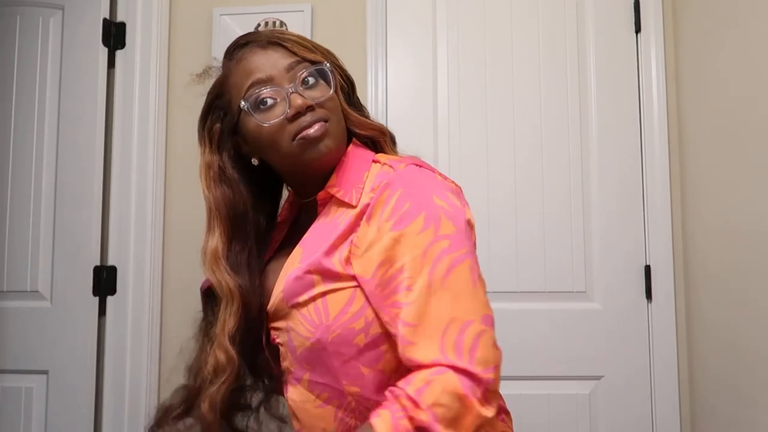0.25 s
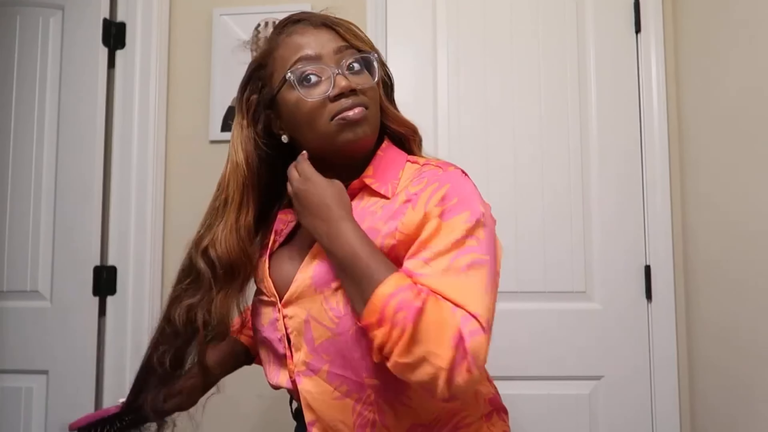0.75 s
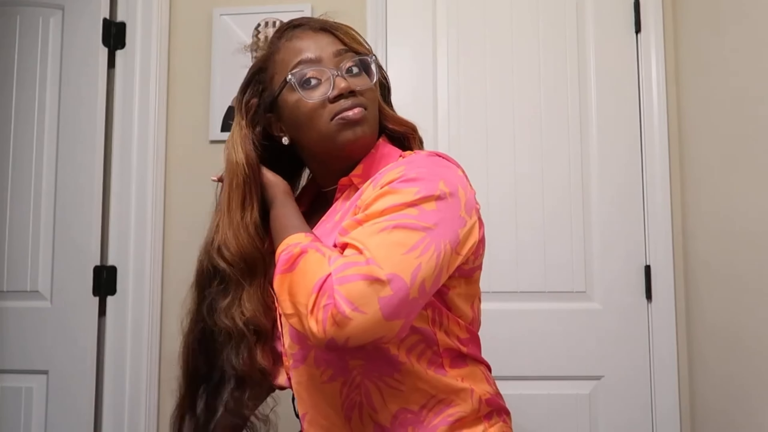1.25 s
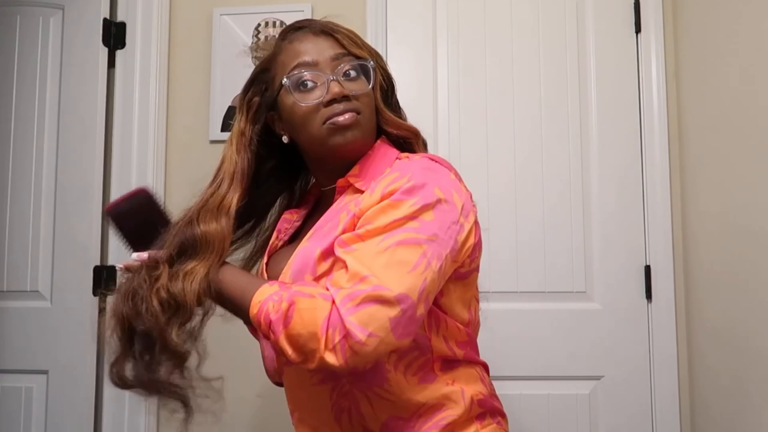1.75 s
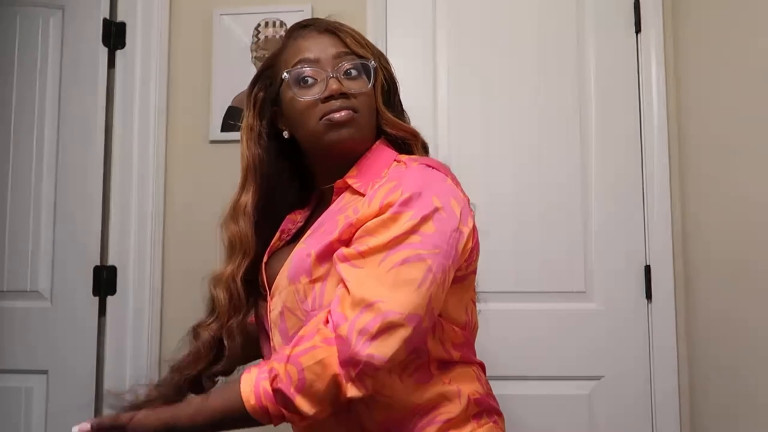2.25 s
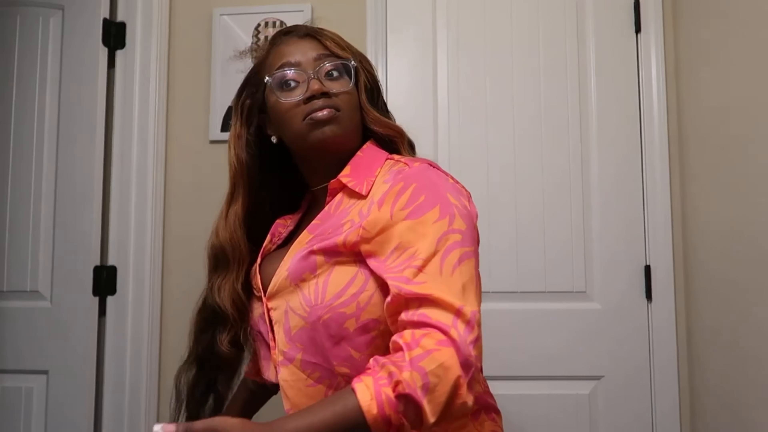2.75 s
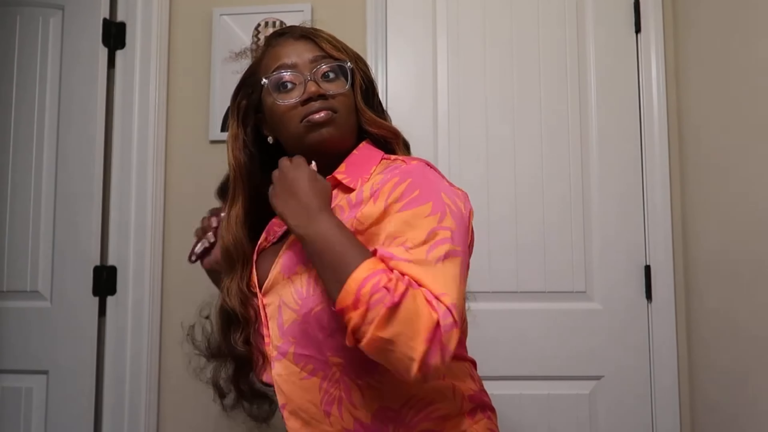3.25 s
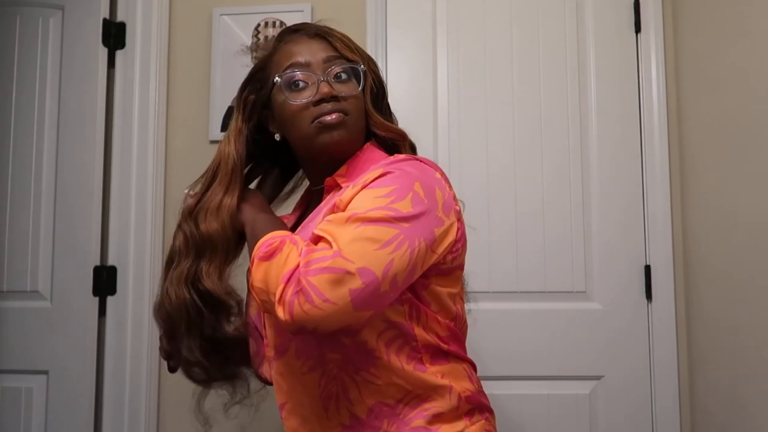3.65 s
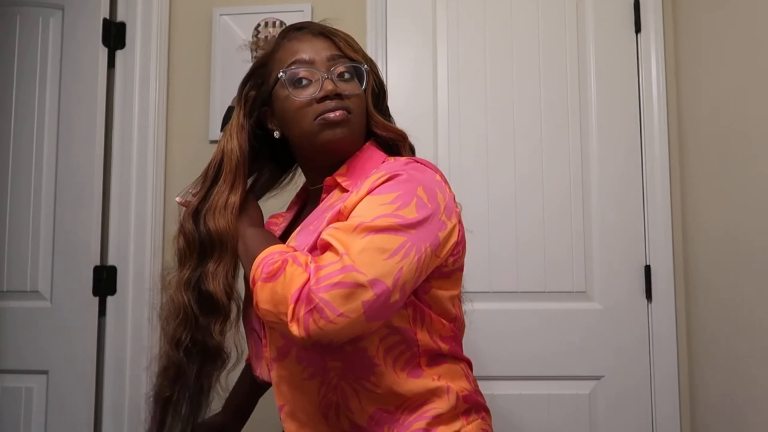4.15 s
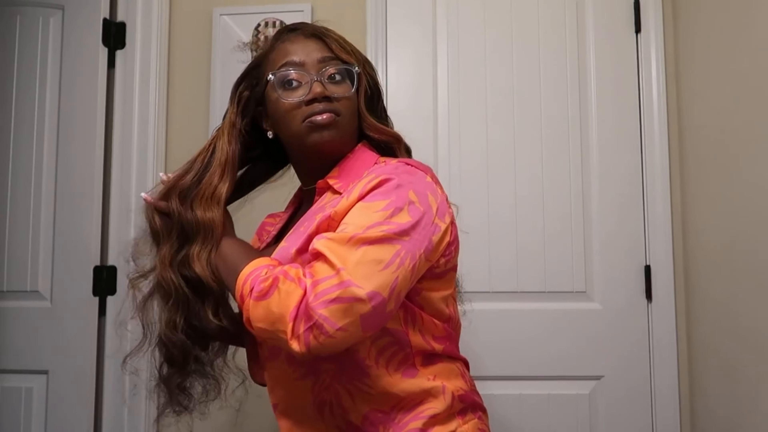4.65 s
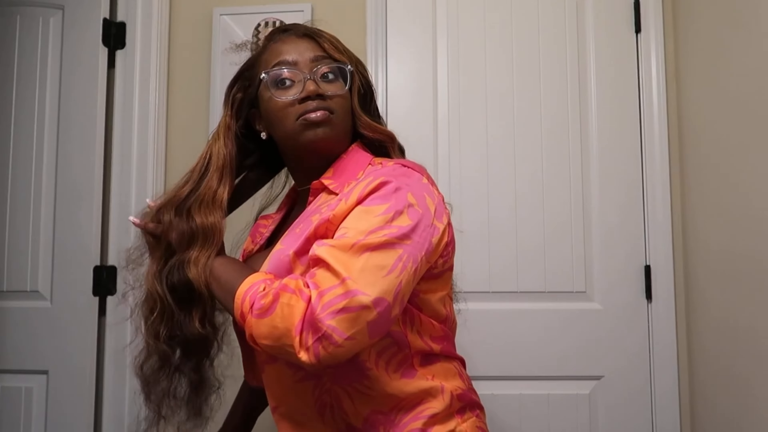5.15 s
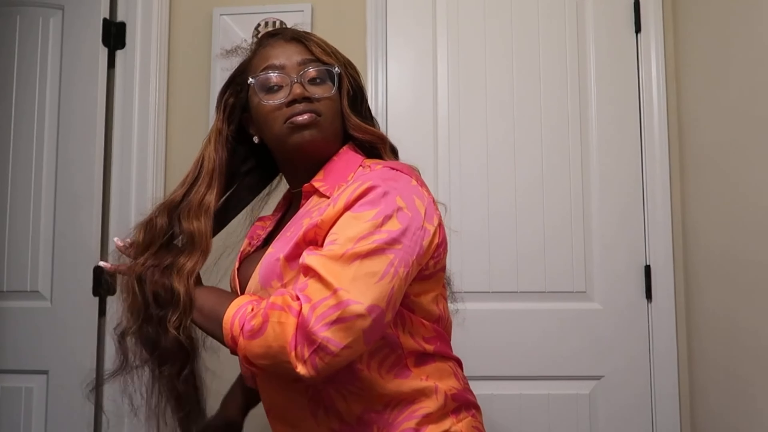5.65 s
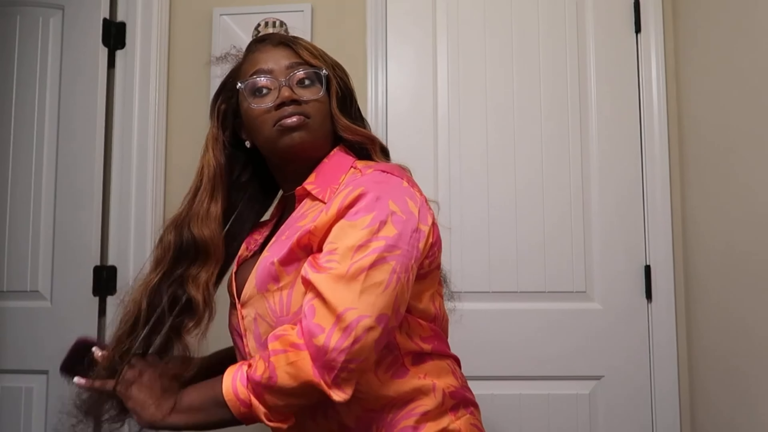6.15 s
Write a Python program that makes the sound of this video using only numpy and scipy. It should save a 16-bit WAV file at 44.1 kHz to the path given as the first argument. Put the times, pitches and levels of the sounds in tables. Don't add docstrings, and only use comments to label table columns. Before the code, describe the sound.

A paddle brush rasps through long wavy hair in swishing strokes, with sharp hollow knocks as knots let go, in a quiet room.

```python
import sys
import numpy as np
from scipy import signal
from scipy.io import wavfile
from scipy.ndimage import uniform_filter1d

SR = 44100
rng = np.random.default_rng(int(sys.argv[2]) if len(sys.argv) > 2 else 0)


def store_pcm(level_fs):
    pcm = np.round(np.clip(level_fs, -1, 1) * 32767).astype(np.int16)
    wavfile.write(sys.argv[1], SR, np.atleast_2d(pcm).T)


def volts(x):
    e = np.asarray(x, float) / 20
    return 10 ** e


N = 282240
MS_COUNT = N * 1000 // SR + 2

# frequency in Hz, density in dB per Hz.
AIR_MID = [(12, -35), (20, -8.5), (109, 1), (140, 1), (175, -8.5), (238, -8), (478, -13.5), (565, -19.5),
           (834, -16.5), (1130, -21.5), (1300, -23), (2610, -24.5), (9130, -38), (12100, -44), (15500, -47)]
# frequency in Hz, density in dB per Hz.
AIR_SIDE = [(20, -32), (74, -16), (130, -11.5), (240, -5), (450, -7.5), (900, -15.5), (1600, -19),
            (3000, -26), (6100, -28.5), (7400, -36), (11800, -31), (14400, -40), (15500, -55), (16000, -70)]
# start in seconds, end in seconds, pull in dB,
# change to the end in dB, rasp over the pull in dB.
GLIDES = [(0.066, 0.112, -46.5, 7.5, -16), (0.114, 0.385, -42, -1, -11), (0.419, 0.688, -44, 3.5, -11.5),
          (0.928, 1.128, -55, 7, -5.5), (1.963, 2.198, -51, 10.5, -13), (2.165, 2.569, -43.5, -1.5, -12),
          (3.394, 3.60, -45.5, 4, -12.5), (3.605, 4.018, -43.5, -1.5, -9), (4.712, 4.875, -42, 1, -10.5),
          (5.86, 6.285, -64, 7.5, -6.5), (6.325, 6.418, -61.5, 26, -16)]
# peak in seconds, pull in dB, thump over the pull in dB,
# upper modes over the pull in dB, fall in dB per second.
TUGS = [(0.15, -41, -22, -13, 61), (0.586, -41, -5, -15, 122), (0.739, -37, -4.5, -4, 120),
        (1.178, -35, 2, 2.5, 150), (1.311, -30.5, 9.5, 5.5, 232), (1.36, -42.5, 5, 2.5, 134),
        (2.60, -43, 7.5, 4, 150), (2.648, -38.5, 4.5, 4.5, 150), (2.709, -24.5, 3, -18, 430),
        (2.791, -31.5, 0, 3, 199), (2.886, -47.5, -2.5, -4, 79), (3.89, -37, -9, -18, 148),
        (4.046, -31.5, -4, 0.5, 262), (4.156, -26, -2, -5, 300), (4.189, -23, -13.5, -1, 270),
        (4.224, -35, -18, 5, 175), (4.906, -28.5, -5, -8.5, 134), (4.96, -37, 0.5, -1, 200),
        (5.008, -37, -2.5, 0, 133), (5.075, -44.5, -4, 3, 150), (5.158, -23, -9.5, -2.5, 216),
        (5.268, -44, -12.5, -5.5, 117), (5.60, -42, -16, -9.5, 200), (5.646, -35.5, -9.5, -17, 163)]
# start in seconds, rasp in dB, hiss over the rasp in dB,
# rise in dB per second, hold in seconds.
SCRAPES = [(0.194, -45, -17, 353, .01), (0.55, -60.5, 0, 82, 0.12), (0.717, -46, -6.5, 400, 0.13),
           (1.102, -61, -18, 298, .02), (1.174, -38.5, -14.5, 700, 0.047), (1.278, -44, -19, 2500, .01),
           (1.293, -30.5, -15.5, 1200, .025), (1.664, -59.5, -5, 33, .15), (2.2, -54.5, -3, 44, .08),
           (2.595, -44, -16, 2000, .02), (2.64, -43, -8.5, 900, 0.033), (2.706, -41, -8, 600, 0.035),
           (2.801, -33, -15.5, 332, 0.039), (3.998, -45, -14, 400, .02), (4.029, -38.5, -11.5, 900, 0.024),
           (4.156, -34.5, -16.5, 1500, 0.026), (4.224, -36.5, -15, 137, 0.0069),
           (4.88, -40.5, -16.5, 500, 0.081), (4.961, -43.5, -9.5, 200, 0.062),
           (5.07, -43, -10.5, 900, 0.018), (5.142, -33, -5.5, 2500, 0.034), (5.64, -56.5, -1, 300, 0.033),
           (5.698, -51.5, -7, 110, .01), (6.218, -64, -13, 400, .06)]
# start in seconds, peak in dB, then thump, upper modes and rasp,
# each over the peak in dB.
SNAGS = [(0.713, -29, -26, -5, -5), (1.154, -35, -15, -3, -3), (1.169, -26.5, -1.5, -8, -13),
         (1.281, -34, -14, -15, 7), (1.295, -17.5, 7, -3.5, -11), (2.556, -32.5, -3, -4, -17),
         (2.594, -27.5, -22, -3, -22), (2.634, -26.5, -22, 2, -24), (2.704, -19, -4, -22, -15),
         (2.72, -33, -22, 7, -6), (2.77, -20, -19, -9, -23), (2.79, -33.5, -11, -13, 6),
         (3.995, -29, -25, -9, -17), (4.023, -26.5, -11, -17, -20), (4.146, -31, 3, -6, -15),
         (4.715, -47, 1, 11.5, -2), (4.791, -30, -32, -19, -18), (4.878, -28, -25, -6, -7.5),
         (4.902, -20.5, -6, -22, -19), (4.96, -24.5, -10, -2, -9), (5.013, -23, -19, -14, -22),
         (5.061, -40, -13, 10, 2), (5.136, -17.5, -30, -7, -9), (5.154, -12.5, -36, -13, -10)]
# start in seconds, peak in dB.
FLICKS = [(0.184, -26), (0.7143, -29), (1.1533, -31), (1.1702, -31), (1.282, -21), (1.295, -19),
          (2.593, -39), (2.633, -36), (2.7015, -29), (3.9923, -35), (4.023, -41), (4.0372, -28),
          (4.1404, -38), (4.147, -26), (4.7142, -44), (4.8763, -31), (4.8998, -25), (5.06, -25),
          (5.138, -26)]
# frequency in Hz, width in Hz, level in dB.
PADDLE_LOW = [(379, 27.6, 1.5), (410.6, 39, 0.5), (471.9, 11.7, -0.5), (507, 25.5, -5), (583.7, 57, -4.5)]
# frequency in Hz, width in Hz, level in dB.
CUSHION_MODES = [(116, 69, -6.5), (134.4, 9.7, -6.5), (235.8, 22.6, 4.5), (300.7, 23, -2)]
# frequency in Hz, width in Hz, level in dB.
PADDLE_HIGH = [(651, 19, -2), (739.6, 40.4, 4.5), (842, 48, -0.5), (894.4, 15, -3.5), (967, 26.4, -2)]
# frequency in Hz, width in Hz, level in dB.
BRISTLE_MODES = [(1450, 140, -5), (2200, 1200, -0.5), (2800, 180, 2), (3570, 100, 3), (5140, 530, -8)]
# frequency in Hz, density in dB per Hz.
RASP_SPECTRUM = [(800, -43), (1080, -2), (1300, -4), (1600, -8), (2000, -5), (2600, -6.5), (3300, -10),
                 (3800, -19.5), (4600, -40)]
# frequency in Hz, density in dB per Hz.
TIPS_SPECTRUM = [(2800, -33.5), (3600, 2.5), (4000, 1), (5200, -1.5), (6300, -5.5), (7000, -10.5),
                 (8300, -6.5), (10000, -47)]
# frequency in Hz, time to fall 60 dB in seconds.
ROOM_DECAY = [(120, 0.14), (330, 0.27), (870, 0.25), (2300, 0.32), (6000, 0.33), (12000, 0.38)]
# frequency in Hz, density in dB per Hz.
HISS_SPECTRUM = [(3000, -30), (4200, -10), (5400, -6), (7400, -12), (11100, -1), (12400, 0), (14200, -7),
                 (14800, -13), (15150, -24), (15400, -70)]
# frequency in Hz, density in dB per Hz.
SHARED_SPECTRUM = [(5000, -25), (7000, 0.5), (9000, -7), (10500, 0.5), (11700, -7), (12600, -15),
                   (14500, -12), (15300, -61)]
# start in seconds, peak in dB.
CRACKS = [
    (1.283, -38),
    (4.025, -44),
    (4.975, -56),
    (5.138, -25),
    (5.146, -32),
]
# frequency in Hz, density in dB per Hz.
CRACK_SPECTRUM = [(6000, -30), (9000, -6), (12000, 0), (15000, -4), (16500, -10), (17500, -40)]
# start in seconds, end in seconds, first step in dB, later steps in dB.
FOCUS_RUNS = [
    (0.373, 0.374, -43, -50),
    (0.964, 1.074, -47, -48),
    (2.011, 2.096, -36, -46),
    (2.389, 2.39, -42, -50),
    (2.914, 3.082, -45, -50),
    (4.299, 4.423, -46, -48),
    (6.219, 6.376, -38, -51),
]
# frequency in Hz, width in Hz, level in dB.
SHELL_MODES = [(3830, 130, 2), (5130, 570, -4)]


def evened(x):
    return x / np.sqrt(np.mean(x ** 2) + 1e-20)


def read(points, hz):
    f, value = np.transpose(points)
    return np.interp(np.log(hz + 1), np.log(f + 1), value)


def air(points, db, patchy_db):
    frames = N // 512 + 5
    hz = np.fft.rfftfreq(2048, 1 / SR)
    real, imag, patches = rng.standard_normal((frames, 1025, 3)).T
    patches = uniform_filter1d(uniform_filter1d(patches, 20, 0), 8, 1)
    gain_db = read(points, hz)[:, None] + patchy_db * evened(patches)
    z = (real + 1j * imag) * volts(gain_db)
    z *= hz[:, None] < 15000
    noise = signal.istft(z, nperseg=2048, noverlap=1536)[1][:N]
    return volts(db) * evened(noise)


def whine():
    t = np.arange(N) / SR
    wander = 30 * np.cumsum(rng.standard_normal(N)) / np.sqrt(SR)
    return volts(-88) * np.sin(2 * np.pi * 11400 * t + wander)


def swell(start, end, change_db, rise, fall):
    t = np.arange(MS_COUNT) / 1000
    hold = change_db * np.clip((t - start) / max(end - start, 1e-4), 0, 1)
    return hold - rise * np.maximum(start - t, 0) - fall * np.maximum(t - end, 0)


def glide(power):
    slide = np.zeros(MS_COUNT)
    for start, end, db, change, rasp in GLIDES:
        over = np.array([0, -10, -7, rasp, rasp - 6.5, rasp - 5])
        curve = swell(start, end, change, rise=540, fall=900)
        level = volts(db + over[:, None] + curve) ** 2
        power[:5] += level[:5]
        slide += level[5]
    lag_s = 0.056
    keep = np.exp(-.001 / lag_s)
    power[5] += np.minimum(slide, signal.lfilter([1 - keep], [1, -keep], slide))


def tug(power):
    for s, db, thump, upper, fall in TUGS:
        over = np.array([[0], [thump], [upper]])
        power[:3] += volts(db + over + swell(s, s, 0, 2.38 * fall, fall)) ** 2


def scrape(power):
    for s, db, hiss, rise, hold in SCRAPES:
        sag_db = -43 * hold
        drag = swell(s, s + hold, sag_db, rise, fall=239)
        slide = swell(s, s + hold, sag_db, rise, fall=300)
        tips = drag - 3.5 + 0.41 * hiss
        power[3:] += volts(db + np.array([drag, tips, slide + hiss])) ** 2


def effort():
    power = np.zeros((6, MS_COUNT))
    glide(power)
    tug(power)
    scrape(power)
    ms = np.arange(N) / SR * 1000
    return np.array([np.interp(ms, np.arange(MS_COUNT), np.sqrt(p)) for p in power])


def plucks(per_s, spread_db, clump_db, clump_s):
    size = volts(spread_db * np.minimum(rng.exponential(1, N), 5))
    size *= rng.choice([-1., 1.], N)
    span = max(int(clump_s * SR), 2)
    drift = uniform_filter1d(rng.standard_normal(N), span)
    clump = evened(uniform_filter1d(drift, span))
    slips = rng.random(N) < per_s / SR
    return evened(size * slips * volts(clump_db * clump))


def ring(modes):
    t = np.arange(4096) / SR
    h = np.zeros(len(t))
    for k, (hz, width, db) in enumerate(modes):
        decay = np.sqrt(width) * np.exp(-np.pi * width * t)
        h += (-1) ** k * volts(db) * decay * np.sin(2 * np.pi * hz * t)
    return h / np.linalg.norm(h)


def colour(points):
    hz = abs(np.fft.fftfreq(2048, 1 / SR))
    log_gain = np.log(volts(np.maximum(read(points, hz), -70)))
    h = np.fft.ifft(np.exp(signal.hilbert(log_gain).conj())).real
    if abs(h[:1024]).sum() <= abs(h[1024:]).sum():
        h = np.roll(h[::-1], 1)
    return h[:1024] / np.linalg.norm(h[:1024])


def flick(drive):
    for s, db in FLICKS:
        drive[3, round(s * SR)] += volts(db + 6)


def snag(drive):
    t = np.arange(900) / SR
    shudder = rng.standard_normal((len(SNAGS), 4, len(t)))
    jolt = np.array([[30.], [25.], [30.], [10.]]) * (t == 0)
    die = np.exp(-t / np.array([[.004], [.005], [.004], [.0015]]))
    for (s, db, *over), shake in zip(SNAGS, shudder):
        at = round(s * SR)
        level = volts(db + np.array([0] + over)[:, None] - 9.0)
        drive[:4, at:at + len(t)] += level * die * (shake + jolt)


def brush(gains):
    slow = plucks(2500, spread_db=2.5, clump_db=1.5, clump_s=.015)
    fast = plucks(6000, spread_db=2.7, clump_db=2.1, clump_s=.009)
    tips = 0.71 * fast + 1.03 * fast[::-1]
    drive = volts(-1.5) * np.vstack([gains[:3] * slow, np.zeros(N), gains[3] * fast, gains[4] * tips])
    flick(drive)
    snag(drive)
    bodies = [ring(PADDLE_LOW), ring(CUSHION_MODES), ring(PADDLE_HIGH), ring(BRISTLE_MODES),
              colour(RASP_SPECTRUM), colour(TIPS_SPECTRUM)]
    sound = sum(signal.oaconvolve(d, h)[:N] for d, h in zip(drive, bodies))
    radiated = signal.butter(4, [100, 10000], "band", fs=SR, output="sos")
    return signal.sosfilt(radiated, sound)


def room(x):
    size = SR // 2
    taps = np.zeros((2, size))
    at = np.arange(180, size - 20, 20) + rng.integers(0, 20, (2, (size - 181) // 20))
    np.put_along_axis(taps, at, rng.choice([-1., 1.], at.shape), 1)
    hz, t, z = signal.stft(taps, SR, nperseg=256)
    # (Hz, correlation)
    coherence = [(200, 1.0), (1500, 0.93), (3000, 0.99), (4500, 0.35), (8000, -0.5)]
    same = np.clip(read(coherence, hz), -1, 1)[:, None]
    z[1] = same * z[0] + np.sqrt(1 - same ** 2) * z[1]
    decay = volts(-60 * t / read(ROOM_DECAY, hz)[:, None])
    tail = signal.istft(z * decay, SR, nperseg=256)[1]
    return signal.fftconvolve(x[None], tail / np.linalg.norm(tail[0]), axes=1)[:, :N]


def crack():
    cracks = np.zeros(N)
    for s, db in CRACKS:
        at = round(s * SR)
        cracks[at:at + 80] += volts(db) * np.exp(-np.arange(80) / 25) * rng.choice([-1., 1.], 80)
    return signal.oaconvolve(cracks, colour(CRACK_SPECTRUM))[:N]


def strands(gain):
    apart, alike = (gain * plucks(20000, spread_db=2.0, clump_db=.8, clump_s=.01) for _ in "ab")
    apart = signal.oaconvolve(apart, colour(HISS_SPECTRUM))[:N]
    alike = volts(-9.0) * signal.oaconvolve(alike, colour(SHARED_SPECTRUM))[:N]
    cracks = crack()
    return np.array([alike + apart + cracks, alike - apart - 0.5 * cracks])


def lens():
    step_s, jitter_s, spread_db = .022, .007, 2
    steps = np.zeros(N)
    for start, end, first_db, later_db in FOCUS_RUNS:
        s = np.arange(start, end, step_s)
        late, size = rng.standard_normal((len(s), 2)).T
        at = ((s + jitter_s * late)[1:] * SR).astype(int)
        steps[at] = volts(later_db + spread_db * size[1:])
        steps[round(start * SR)] = volts(first_db)
    h = signal.sosfilt(signal.butter(4, 9000, fs=SR, output="sos"), ring(SHELL_MODES))
    return signal.oaconvolve(steps, h / abs(h).max())[:N]


def scene():
    gains = effort()
    hair = brush(gains)
    lag = 2
    direct = np.array([hair * volts(4.0), np.roll(hair, lag) * volts(3.0)])
    mid = air(AIR_MID, -50.5, patchy_db=0.75)
    side = air(AIR_SIDE, -55.5, patchy_db=-0.4) + whine()
    background = np.array([mid + side, mid - side])
    shell = lens() * np.array([[.8], [-1.2]])
    stroke = volts(-2.5) * direct + volts(-5.5) * room(hair) + strands(gains[5])
    return stroke + background + shell


def low_pass(x):
    return signal.sosfilt(signal.butter(12, 16140, fs=SR, output="sos"), x)


def record(dry):
    return low_pass(dry)


dry = scene()
out = record(dry)
store_pcm(out)
```